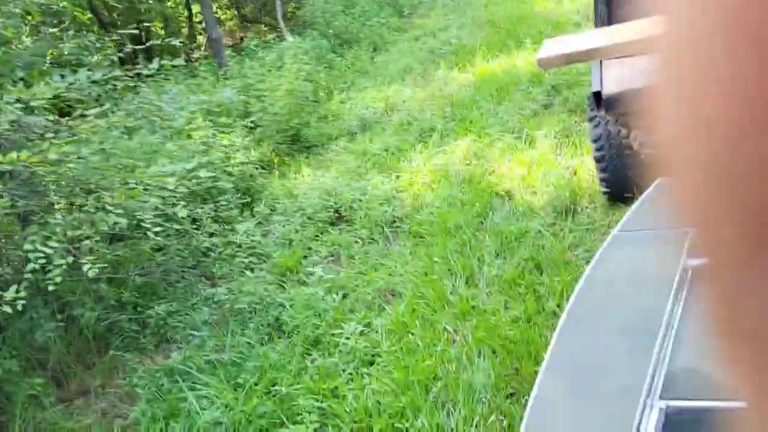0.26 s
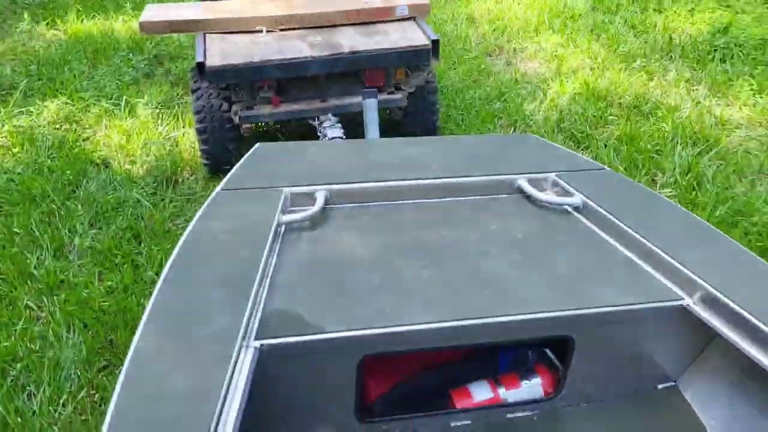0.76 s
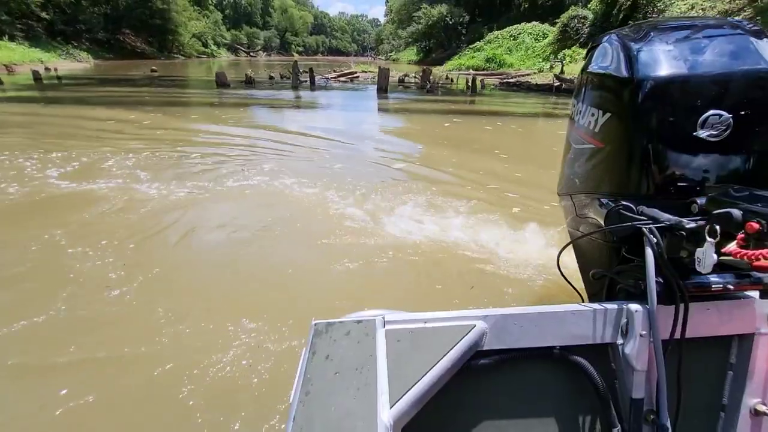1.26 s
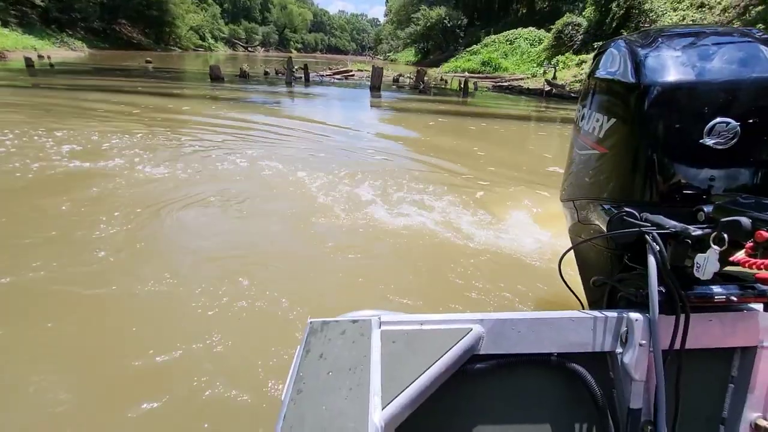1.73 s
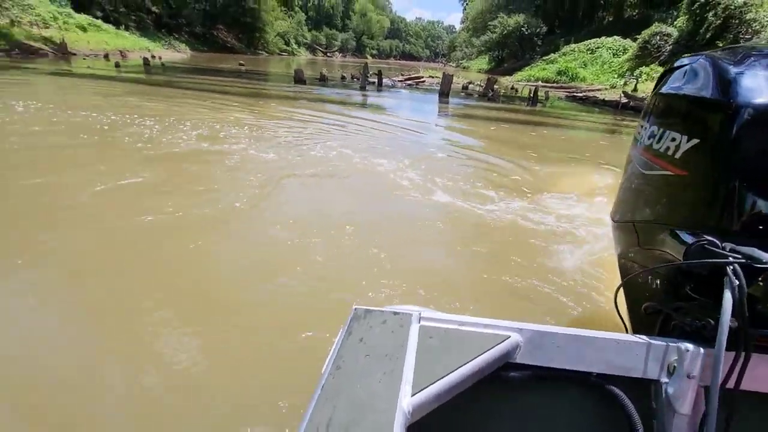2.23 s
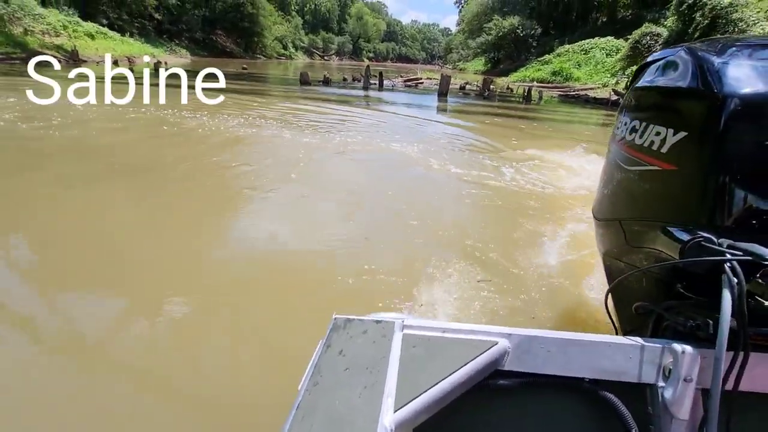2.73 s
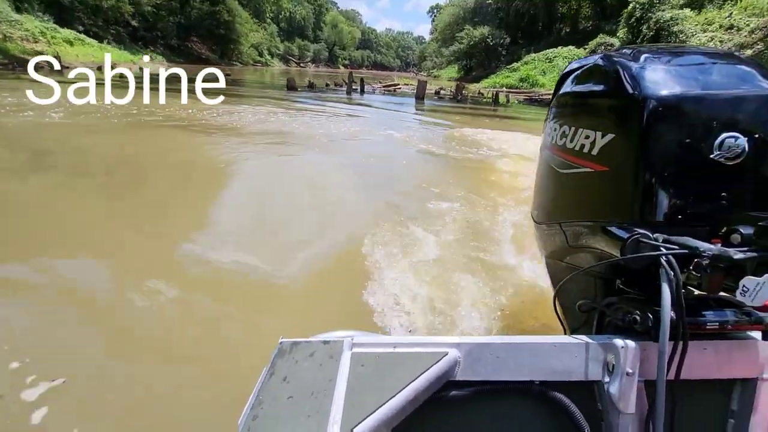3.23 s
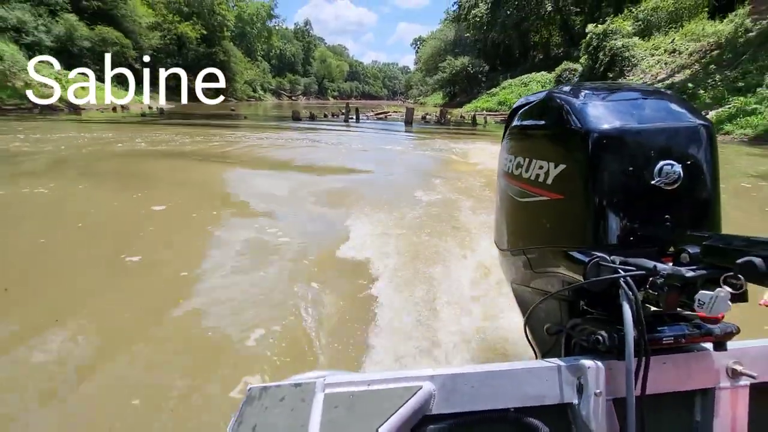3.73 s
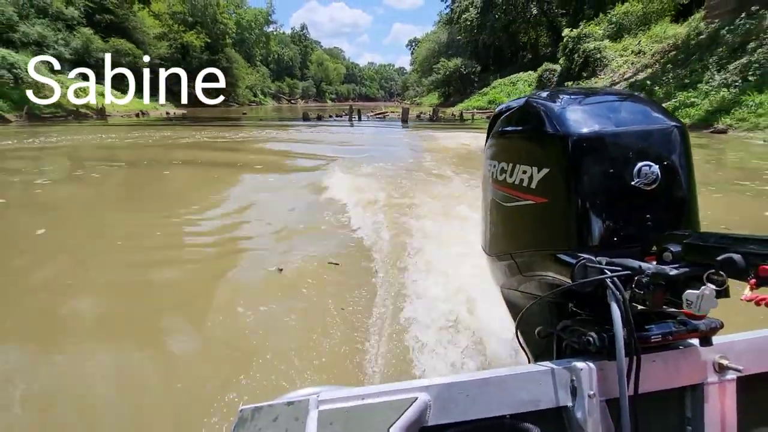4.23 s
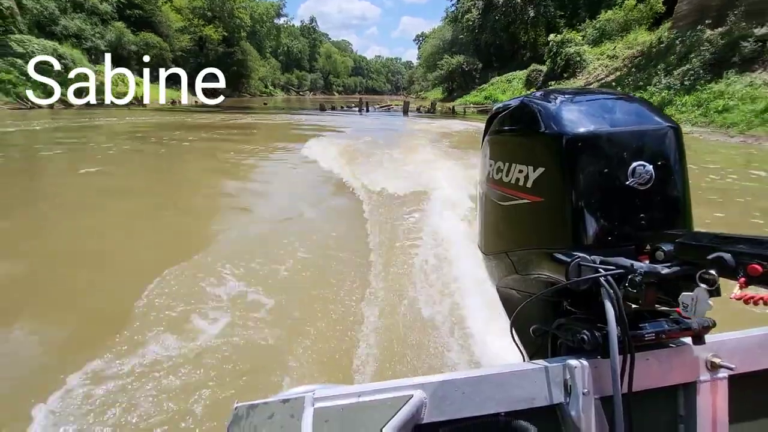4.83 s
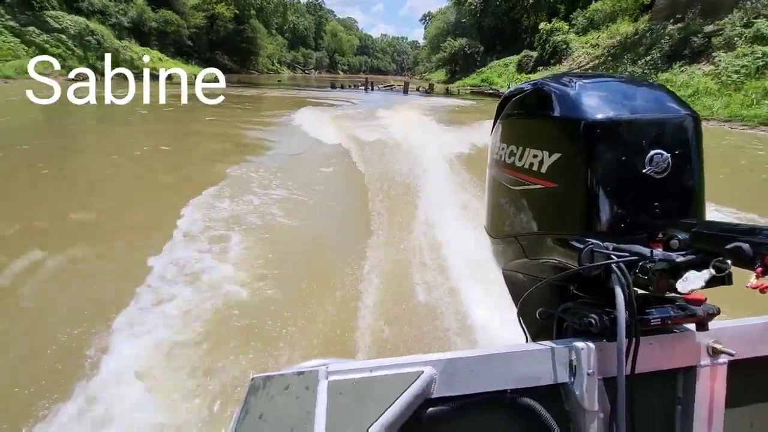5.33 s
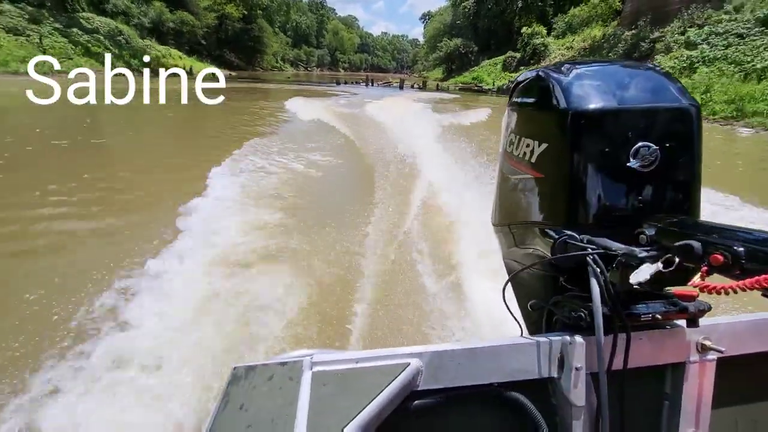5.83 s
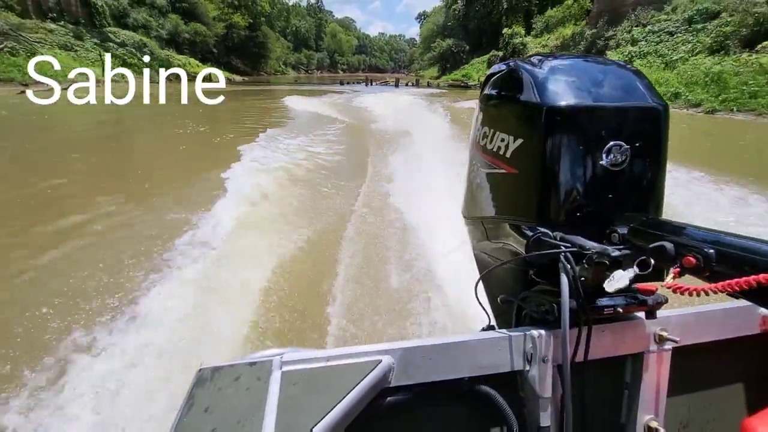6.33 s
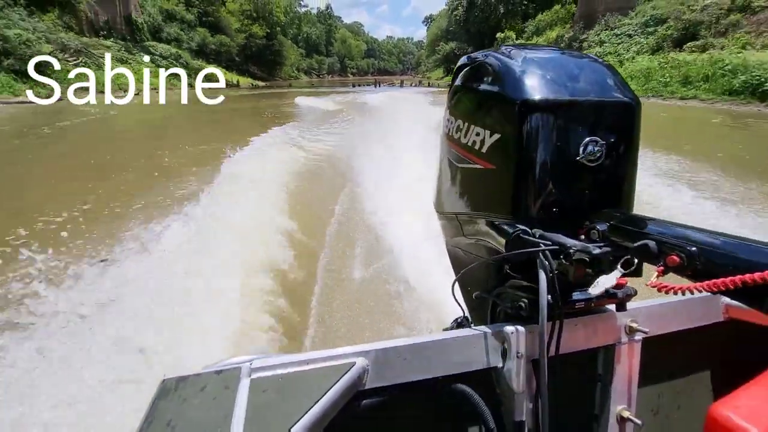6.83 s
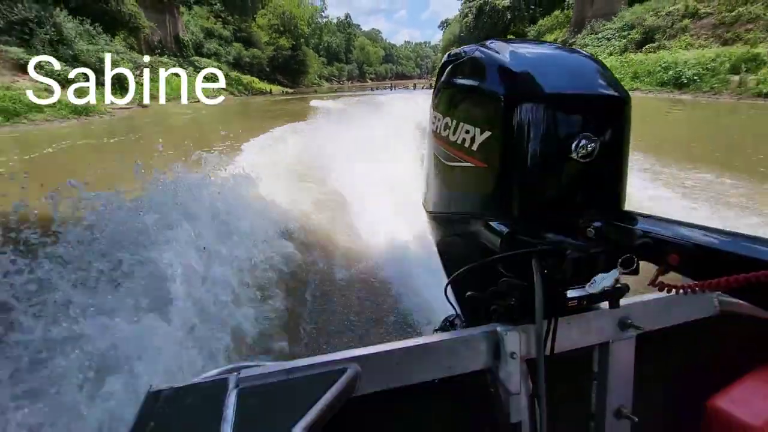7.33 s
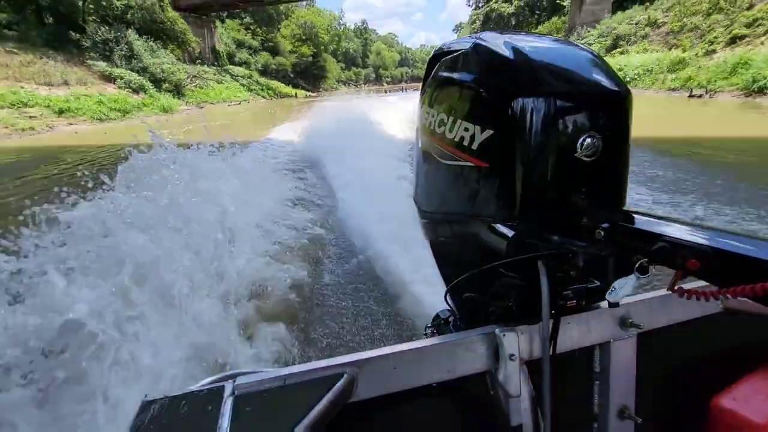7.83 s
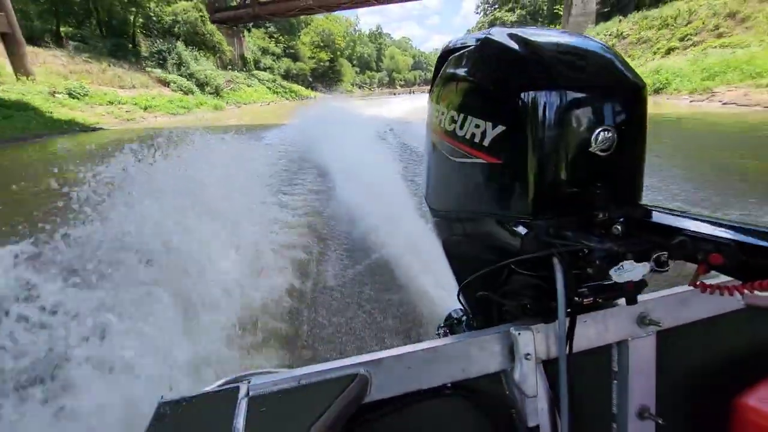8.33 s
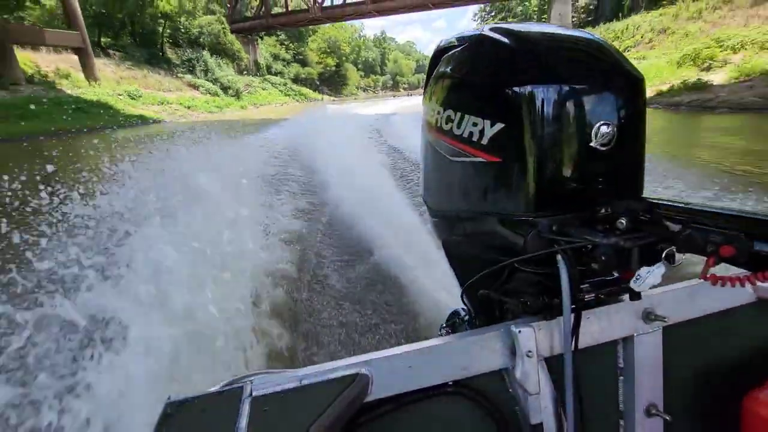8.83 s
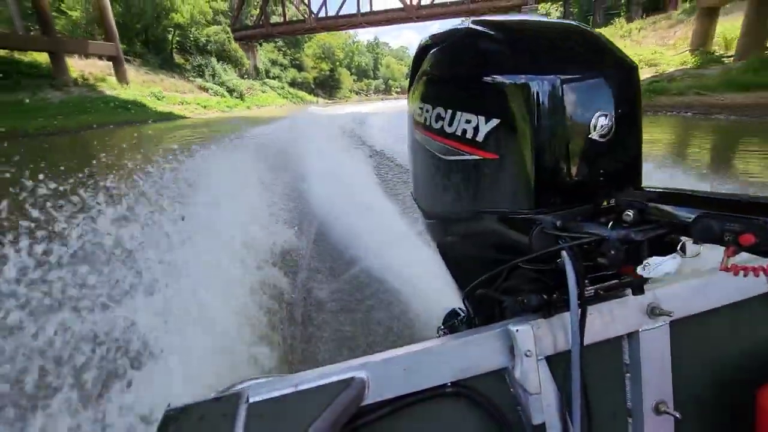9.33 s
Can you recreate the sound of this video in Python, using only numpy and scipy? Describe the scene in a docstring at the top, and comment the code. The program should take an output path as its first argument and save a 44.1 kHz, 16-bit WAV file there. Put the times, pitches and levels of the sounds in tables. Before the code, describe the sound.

Fingers fumble on the microphone on a quiet grassy bank, then a hard cut to an outboard jet motor winding up to a loud steady roar.

```python
"""Fingers on the microphone body first, with rustles, insects and a thin chirp on a quiet grassy bank; then a hard
cut to a four-cylinder four-stroke outboard jet, heard from the boat as it winds up and holds full throttle.
The engine is a stack of sines on the orders of its cycle plus puffed turbulence noise; jet and hull throw
bright grainy spray noise; the headwind is lumpy low noise with crackles. The bank is shaped noise and sines."""
import sys
import numpy as np
from scipy import signal
from scipy.fft import rfft, irfft, next_fast_len
from scipy.io import wavfile
from scipy.ndimage import uniform_filter1d, minimum_filter1d

SR = 44100
rng = np.random.default_rng(int(sys.argv[2]) if len(sys.argv) > 2 else 0)


def digitize_waveform(pressure):
    """Quantize a signal to 16-bit integers and store it at the path in sys.argv[1].

    Rows of a 2-D input are taken as channels; values are limited to [-1, 1].
    """
    field = np.atleast_2d(pressure).T
    bounded = np.clip(field, -1, 1)
    quanta = np.round(bounded * 32767).astype(np.int16)
    wavfile.write(sys.argv[1], SR, quanta)


N = 421596


def amp(db):
    """Decibels to a linear gain."""
    return 10 ** (np.asarray(db) / 20)


def rms_one(x):
    """Scale to an rms of 1."""
    return x / np.sqrt(np.mean(x ** 2) + 1e-20)


def in_time(rows):
    """Draw straight lines between table rows: one curve per column after t."""
    s, *columns = np.transpose(rows)
    t = np.arange(N) / SR
    return [np.interp(t, s, column) for column in columns]


def at_hz(points, hz):
    """Read a spectrum table on a log frequency axis."""
    table_hz, value = np.array(points)[:, :2].T
    return np.interp(np.log(hz), np.log(table_hz), value)


def pan(db):
    """Left and right gains for a level difference."""
    return amp(np.array([db / 2, -db / 2]))


def burst(s, spread_s):
    """A bell-shaped swell centred on s, with its standard deviation in seconds."""
    return np.exp(-.5 * ((np.arange(N) / SR - s) / spread_s) ** 2)


def drift(rate, step=1):
    """Slow chance, read at every step-th sample: sparse noise through a double one-pole low-pass; spread 1."""
    r = np.exp(-80 * np.pi * rate / SR)   # rate in Hz; one noise value per 40 samples
    noise = rng.standard_normal(N // 40 + 2002)
    slow = signal.lfilter([1], [1, -2 * r, r * r], noise)[2000:]   # skip the filter's run-in
    return np.interp(np.arange(0, N, step) / 40, np.arange(len(slow)), rms_one(slow))


def resonance(x, hz, width):
    """Two-pole ringing band around hz, width in Hz."""
    r = np.exp(-np.pi * width / SR)
    poles = [1, -2 * r * np.cos(2 * np.pi * hz / SR), r * r]
    return signal.lfilter([(1 - r * r) / 2, 0, (r * r - 1) / 2], poles, x)


# How alike the two ports hear the motor: f/Hz, likeness (0 to 1)
PORT_LIKENESS = [(60, 0.36), (170, 1), (400, 0.7), (1000, 0.36), (2000, 0.094), (4000, 0.029),
                 (15000, 0.049)]
# Stereo lean of the motor: f/Hz, left minus right level/dB
PORT_LEAN = [(60, 23), (110, -12), (200, -1), (380, 0), (700, -3.5), (1290, -4.5), (2380, -3.5),
             (4400, 0.5), (8120, -4.5), (15000, -6)]
LAG_S = 0.00026   # the motor's noise reaches the right port first


def coloured(spectrum, alike=None, count=1, patchy_db=0, rate=10):
    """Stereo noise of a spectrum; overlapping bands flicker partly alone, partly together; rms 1."""
    size = next_fast_len(N)
    hz = np.maximum(np.arange(size // 2 + 1) * SR / size, 1)
    mid, side = rfft(rng.standard_normal((2, size)))
    signs = np.array([[1], [-1]])   # left, right
    lean = 1
    if alike is None:   # a source at the stern: later on the left, leaning by frequency
        alike = at_hz(PORT_LIKENESS, hz)
        lean = pan(at_hz(PORT_LEAN, hz)) * np.exp(-1j * np.pi * hz * LAG_S * signs)
    c = np.clip(alike, 0, 1)
    both = lean * amp(at_hz(spectrum, hz)) * (np.sqrt(1 + c) * mid + np.sqrt(1 - c) * side * signs)
    if count == 1:
        return rms_one(irfft(both, size)[:, :N])
    band_span = np.log([spectrum[1][0], spectrum[-1][0]])
    place = np.interp(np.log(hz), band_span, [0, count - 1])
    together = drift(3.3)
    out = np.zeros((2, N))
    for k in range(count):
        band = irfft(both * np.maximum(1 - abs(place - k), 0), size)[:, :N]
        out += band * amp(patchy_db * (0.098 * together + drift(rate)))
    return rms_one(out)


# Firing tone, order 4, before its waver: t/s, rms level/dB
FIRING_LEVEL = [(1.25, -39), (1.5, -16.5), (1.64, -12), (1.8, -22.5), (2.0, -20.5), (2.16, -12),
                (2.3, -18.5), (2.55, -23.5), (2.7, -16), (3.2, -9), (3.5, -18), (4.15, -11), (5.0, -9),
                (6.35, -9), (6.5, -12), (7.1, -13), (8.3, -10), (8.9, -13), (9.25, -8), (9.56, -15.5)]
# What the exhaust passes of orders 8 and 12: f/Hz, level above the growl curve/dB
EXHAUST_PIPE = [(90, 14), (140, 8.5), (200, 5.5), (225, -1), (270, -1), (340, -6), (440, -12.5),
                (530, -13.5)]
# Housing resonances that lift passing orders: f/Hz, width at half the lift/Hz, lift/dB
HOUSING_RINGS = [(69, 4.5, 6), (251.1, 12.3, 13.5), (420, 46, 3.5), (690, 60, 9.5), (847, 38, 5),
                 (1015, 27, 6), (1690, 50, 1.5), (1883, 90, 8.5)]
# Weak orders come forward under load: t/s, level/dB
LOAD_STRAIN = [(1.3, -1), (2.7, 2), (3.0, 4), (3.9, 3.5), (4.5, 1), (7.2, 0.5), (7.9, 1.5), (8.6, -1)]
# Overtones swell and fade: t/s, order 6 level/dB, orders 8 and 12 level/dB, order 16 level/dB
OVERTONE_SWELLS = [(1.3, 4, -10, -10), (1.5, 0, 0.5, 1), (2.6, -4, 0.5, -10), (3.4, -12, -0.5, -3),
                   (3.75, -2, 0, -1), (4.05, 1, -2, -14), (4.5, 2.5, -9.5, 1), (5.7, -3, -0.5, 5),
                   (7.0, -8, -1, 2.5), (7.9, 4, 2, 2.5), (8.5, 4.5, 2.5, -3), (8.9, -1, -5.5, -17)]
# Orders that uneven cylinders lift or cancel: order (multiple of the cycle rate), level/dB
UNEVEN_ORDERS = [(2, -4), (5, 2.5), (7, 0.5), (10, 2.5), (13, -18), (14, 4), (18, -18), (19, 5.5),
                 (20, -1.5), (21, 4.5), (22, -9), (24, 1.5), (26, -0.5), (38, 2.5), (44, 0)]
# The hand turns the ports: t/s, lag of the exhaust tone at the left port/s
EXHAUST_LAG = [(1.2, 0.00012), (2.3, 0.00034), (3.6, 0.00018), (5.2, 0.00015), (9.5, 0.000099)]
ROUGH_DB, STEADY_DB = 2.6, .6   # faster waver of the orders while labouring, and at full throttle
SLOW_WAVER_DB = 2.5   # weak orders come and go
WEAK_DB, WEAK_DB_PER_OCTAVE = -11.5, -5   # order 2 against the growl curve, and the fall above it
EVEN_DB, FOURTH_DB = 1.5, 3.5   # whole crank turns stand out, multiples of the firing rate more so
LABOUR_DB = 7   # extra for multiples of the firing rate, fading out as the boat planes


def engine(cycles, phase, growl_db, planing, step=40):
    """Exhaust tone: sines on the orders of the cycle; their slow levels are worked out on a coarse grid."""
    speed, growl_db, labouring = cycles[::step], growl_db[::step], 1 - planing[::step]
    strain_db = in_time(LOAD_STRAIN)[0][::step]
    waver_db = ROUGH_DB + (STEADY_DB - ROUGH_DB) * planing[::step] ** 2
    sixth_db, low_db, high_db = np.array(in_time(OVERTONE_SWELLS))[:, ::step]

    levels = {4: in_time(FIRING_LEVEL)[0][::step] + STEADY_DB * drift(14, step)}
    for k in [8, 12]:
        levels[k] = growl_db + low_db + at_hz(EXHAUST_PIPE, k * speed) + waver_db * drift(18, step)
    # weak orders follow the growl curve, ring in the housing and waver on their own
    for k in sorted(set(range(2, 47)) - set(levels)):
        even, fourth = k % 2 == 0, k % 4 == 0
        order_db = WEAK_DB + WEAK_DB_PER_OCTAVE * np.log2(k / 2) + EVEN_DB * even
        order_db = order_db + (FOURTH_DB + LABOUR_DB * labouring) * fourth
        lift_db = sum(db / (1 + (2 * (k * speed - hz) / width) ** 2) for hz, width, db in HOUSING_RINGS)
        wander_db = SLOW_WAVER_DB * drift(1.64, step) + waver_db * drift(9.2, step)
        levels[k] = growl_db + strain_db + order_db + lift_db + wander_db
    levels[6] += sixth_db
    levels[16] += high_db
    for k, db in UNEVEN_ORDERS:
        levels[round(k)] += db

    out, fine, coarse = np.zeros((2, N)), np.arange(N), np.arange(0, N, step)
    half_lag = np.pi * cycles * in_time(EXHAUST_LAG)[0]   # as phase of the cycle
    ports = np.array([phase - half_lag, phase + half_lag])
    for k, level_db in levels.items():
        lean = pan(at_hz(PORT_LEAN, np.maximum(k * speed, 200)))
        gains = np.sqrt(2) * amp(level_db) * lean   # rms to peak
        for side in range(2):
            sine = np.sin(k * ports[side] + k * k * 2.4)   # start phases spread over the orders
            out[side] += np.interp(fine, coarse, gains[side]) * sine
    return out


# Full-throttle growl colour: f/Hz, relative level per Hz/dB
FULL_GROWL_COLOUR = [(59, -42), (100, -28), (119, -17), (145, -10.5), (177, -7), (198, -11.5), (228, -9),
                     (350, -12), (560, -16.5), (693, -15), (765, -14), (1900, -23.5), (3000, -35),
                     (3900, -52), (6600, -120)]
# Idle growl colour: f/Hz, relative level per Hz/dB
IDLE_GROWL_COLOUR = [(120, -33), (200, 10.5), (345, -4), (437, 2.5), (536, -12), (872, -8.5), (1000, -7.5),
                     (1270, -6), (3000, -29), (3900, -68), (6600, -120)]
# Cowl resonances, plain at low speed: f/Hz, width of each of two passes/Hz, level against the idle noise/dB
COWL_RINGS = [(436.4, 32, -3.5), (872, 33, -9.5), (1564, 33, -16), (2080, 140, -16)]
# Narrow hiss, before its waver: t/s, level/dB
WHISTLE_LEVEL = [(1.1, -74), (1.7, -60), (2.2, -47), (3.2, -42.5), (3.5, -51), (4.5, -70)]
WHISTLE_HZ, WHISTLE_WIDTH_HZ = 5510, 130


def growl(phase, growl_db, planing):
    """Intake and exhaust turbulence, puffed at each firing, the cylinders unequal; a narrow whistle on top."""
    puffs = 1 + 0.26 * np.cos(4 * phase) + 0.099 * np.cos(phase) + 0.043 * np.cos(2 * phase + 1.7)
    full = coloured(FULL_GROWL_COLOUR, count=7, patchy_db=2.87, rate=8.7)
    idle = coloured(IDLE_GROWL_COLOUR)
    white = coloured([(20, 0), (20000, 0)])
    for hz, width, db in COWL_RINGS:
        ring = resonance(resonance(white, hz, width), hz, width)
        idle += amp(db + 0.83 * drift(6.0)) * rms_one(ring)
    hiss = rms_one(resonance(white, WHISTLE_HZ, WHISTLE_WIDTH_HZ))
    whistle = amp(in_time(WHISTLE_LEVEL)[0] + 1.0 * drift(9)) * hiss
    blend = amp(-4.5) * np.sqrt(planing) * full + amp(-1.0) * np.sqrt(1 - planing) * idle
    return amp(growl_db) * puffs * blend + whistle


# Jet and wake at full throttle: f/Hz, relative level per Hz/dB
WAKE_COLOUR = [(880, -4), (1500, -7.5), (1610, 3), (1900, 1.5), (2200, -8), (2550, -11), (3170, -9.5),
               (4290, -10), (4970, -7.5), (6420, -13), (8450, -6), (10400, -15.5), (12900, -16),
               (14900, -16), (15700, -24)]
# Churning water before the boat moves: f/Hz, relative level per Hz/dB
CHURN_COLOUR = [(880, -2), (1500, 3.5), (2140, 7), (2310, 5.5), (3930, -1), (5600, -0.5), (7440, -3.5),
                (8540, 1.5), (10500, -4.5), (12900, -2), (15700, -6)]


def spray(spray_db, planing):
    """Jet and wake: bright noise, with drops that crackle through it."""
    drop_size = amp(2.8 * np.minimum(rng.exponential(1, (2, N)), 5))
    drops = drop_size * (rng.random((2, N)) < 2500 / SR)   # about 2500 drops a second per port
    grain = rms_one(1 + 4.0 * uniform_filter1d(drops, size=40))
    wake = coloured(WAKE_COLOUR, count=7, patchy_db=1.0, rate=13.0)
    churn = coloured(CHURN_COLOUR)
    blend = amp(0.5) * np.sqrt(planing) * wake + amp(2.0) * np.sqrt(1 - planing) * churn
    return amp(spray_db) * grain * blend


# Headwind, rising to hard gusts near the end, before the wind gain: t/s, left level/dB, right level/dB
HEADWIND = [(1.13, -32.5, -35), (1.9, -30.5, -36), (2.5, -29, -33), (3.05, -35, -36), (3.2, -30, -31),
            (3.6, -37, -41), (5.0, -33, -31.5), (6.3, -34.5, -36), (6.9, -28.5, -43), (8.0, -31.5, -36),
            (8.4, -18, -37), (8.85, -19.5, -33), (9.2, -11.5, -24), (9.55, -21, -42)]
# Wind colour: f/Hz, relative level per Hz/dB
WIND_COLOUR = [(12, -39.5), (20, -22), (53, 6.5), (85, 8.5), (166, -1.5), (238, -6), (464, -11),
               (1120, -20), (1500, -47), (1950, -68.5), (3300, -120)]
# Single puffs on the left port, before the wind gain: t/s, level/dB
PUFFS = [(3.82, -17), (4.38, -26), (4.53, -22), (4.77, -24), (5.27, -33), (5.45, -26), (6.32, -24),
         (6.48, -27), (6.65, -26), (6.84, -27), (6.97, -20.5), (7.15, -18.5), (7.56, -30), (7.72, -38),
         (7.91, -16.5), (8.26, -35), (8.42, -18.5)]
# Wind crackles on the left port, before the crackle trim: t/s, level/dB
GUST_CRACKLES = [(7.167, -11), (7.469, -14), (7.908, -27), (8.237, -8), (8.347, -33), (8.352, -8),
                 (8.369, -7), (8.517, -9), (8.528, -8), (8.737, -15), (9.014, -5.5), (9.058, -12),
                 (9.123, -7.5), (9.157, -24), (9.212, -31), (9.247, -21), (9.287, -7)]
PUFF_SPREAD_S, CRACKLE_SPREAD_S = 0.021, .003
WIND_ALIKE = .55   # likeness of the wind noise at the two ports


def wind():
    """Lumpy low noise, partly each port's own; hard gusts crackle on the exposed left port."""
    level = amp(in_time(HEADWIND))
    level[0] += sum(amp(db) * burst(s, PUFF_SPREAD_S) for s, db in PUFFS)
    lumps = amp(np.array([2.0 * drift(36), 3.3 * drift(5.3)]))   # left, right
    out = amp(6.0) * level * rms_one(coloured(WIND_COLOUR, alike=WIND_ALIKE) * lumps)
    crackle_colour = [(100, 13), (300, 6.0), (1200, -9.0), (3500, -27.0), (8000, -37)]
    crackle = coloured(crackle_colour, alike=0)[0]
    gusts = sum(amp(db + 1.5) * burst(s + .002, CRACKLE_SPREAD_S) for s, db in GUST_CRACKLES)
    pops = level[0] * amp(-7.0 + 4.3 * np.minimum(drift(41), 2))   # small pops ride on every gust
    out[0] += crackle * (gusts + pops)
    return out


# Hand moving at the left port: t/s, rumble level/dB
HAND_RUMBLE = [(.01, -41.5), (.1, -37.5), (.17, -32), (.24, -44), (.47, -60), (.65, -54), (.8, -49),
               (.88, -44.5), (1.05, -48.5)]
# Fingers rubbing the right port: t/s, level/dB
FINGER_RUBS = [(.17, -47), (.39, -36.5), (.46, -36), (.57, -42), (.69, -38), (.89, -41)]
# Lower rustle colour: f/Hz, relative level per Hz/dB
LOW_RUSTLE_COLOUR = [(88, -20.5), (150, -10.5), (451, -11), (568, -20), (734, -20.5), (1110, -31),
                     (1500, -27), (2240, -22), (3200, -36), (4160, -64), (7040, -120)]
# Upper rustle colour: f/Hz, relative level per Hz/dB
HIGH_RUSTLE_COLOUR = [(1470, -39), (2500, -11), (4480, -4), (6790, -11), (8750, -4), (9600, -13),
                      (13800, -12), (15700, -20)]
RUB_SPREAD_S, RIGHT_REST_DB = 0.035, -53
LOW_RUSTLE_DB, HIGH_RUSTLE_DB = -54, -60.5   # at mean handling
LOW_FOLLOWS, HIGH_FOLLOWS = 0.75, .4   # share of the rumble's swing in dB


def handling():
    """Hand and finger friction: low rumble, with two rustling noise beds that follow the hand."""
    hand_db, = in_time(HAND_RUMBLE)
    swing_db = hand_db - np.mean(np.transpose(HAND_RUMBLE)[1])
    fingers = amp(RIGHT_REST_DB) + sum(amp(db) * burst(s, RUB_SPREAD_S) for s, db in FINGER_RUBS)
    rumble = coloured([(15, -30), (40, 9.5), (110, 0), (250, -29), (600, -44)], alike=.5)
    out = np.array([amp(hand_db), fingers]) * rumble
    out += amp(LOW_RUSTLE_DB + LOW_FOLLOWS * swing_db) * coloured(LOW_RUSTLE_COLOUR, alike=0.37)
    out += amp(HIGH_RUSTLE_DB + HIGH_FOLLOWS * swing_db) * coloured(HIGH_RUSTLE_COLOUR, alike=0.084)
    return out


# Thumps of the hand, before a 3 dB cut: t/s, peak level/dB, f/Hz, left minus right level/dB, 60 dB decay/s
HAND_THUMPS = [(0.029, -25, 59.2, 27, 0.031), (0.159, -8.5, 84.5, -22, 0.025),
               (0.655, -36, 70.0, -22.0, 0.11), (0.819, -23, 91.5, 0, 0.13)]


def thumps():
    """Each knock is a low sine that starts at once and dies away exponentially."""
    t = np.arange(N) / SR
    out = np.zeros((2, N))
    for s, db, hz, side_db, t60 in HAND_THUMPS:
        age = np.maximum(t - s, 0)
        out += pan(side_db)[:, None] * amp(db - 3.0 - 60 * age / t60) * np.sin(2 * np.pi * hz * age)
    return out


# Hand and cloth, before a 3.5 dB cut: t/s, level/dB, centre f/Hz, width/octaves, spread/s
CLOTH_RUSTLES = [(0.16, -45, 8000, 1.2, 0.0058), (0.179, -42, 5000, 2.9, 0.015), (.24, -50, 6000, 2, 0.013),
                 (.39, -54, 9000, 1.2, 0.02), (.43, -59, 9000, 1.2, .015), (.52, -57, 1400, 1.2, 0.011),
                 (0.616, -53, 1700, .7, 0.013), (.715, -40, 420, 0.74, 0.0084),
                 (0.718, -53, 1800, 1.4, 0.016), (0.825, -54, 8000, 1.5, 0.0099),
                 (.88, -60, 2100, 0.35, .12), (.27, -60, 4200, 0.27, 0.055),
                 (1.02, -39.5, 7340, 0.37, 0.0037), (1.035, -40, 420, 0.82, 0.016),
                 (1.032, -51, 2000, 1.2, 0.016)]


def rustles():
    """Rubbing hand and cloth: short bell-shaped swells of band-passed noise."""
    white = rng.standard_normal((2, SR * 2))
    out = np.zeros((2, N))
    for s, db, hz, octaves, spread_s in CLOTH_RUSTLES:
        edges = np.minimum(hz * 2 ** (np.array([-.5, .5]) * octaves), .45 * SR)
        band = signal.sosfilt(signal.butter(2, edges, "band", fs=SR, output="sos"), white)
        out[:, :SR * 2] += amp(db - 3.5) * burst(s, spread_s)[:SR * 2] * rms_one(band)
    return out


# Thin chirp: t/s, f/Hz, peak level/dB
CHIRP_GLIDE = [(.70, 8000, -95), (.72, 7970, -70), (.74, 8300, -68), (.78, 8700, -63), (.84, 8750, -60),
               (.87, 9400, -70), (.91, 9500, -64), (.93, 9500, -85)]


def chirp():
    """One sine gliding in pitch and level, equal in both ports."""
    hz, db = in_time(CHIRP_GLIDE)
    return amp(db) * np.sin(2 * np.pi * np.cumsum(hz) / SR)


INSECT_DB, INSECT_HZ, INSECT_WIDTH_HZ = -66.5, 8750, 500   # width of each resonance pass


def insects():
    """Insect drone: two seconds of noise through the same resonance twice."""
    white = rng.standard_normal((2, SR * 2))
    drone = resonance(resonance(white, INSECT_HZ, INSECT_WIDTH_HZ), INSECT_HZ, INSECT_WIDTH_HZ)
    out = np.zeros((2, N))
    out[:, :SR * 2] = amp(INSECT_DB) * rms_one(drone)
    return out


# Engine speed: t/s, cycle rate f/Hz (a cycle is two crank turns)
ENGINE_SPEED = [(1.12, 10.5), (1.42, 11.7), (1.52, 13.74), (1.62, 16.99), (1.72, 19.13), (1.82, 20.89),
                (2.02, 22.55), (2.32, 26.74), (2.42, 27.2), (2.82, 28.26), (2.92, 30.08), (3.02, 32.78),
                (3.42, 41.08), (3.54, 42.1), (3.87, 43.87), (4.4, 43.61), (5.6, 43.63), (6.3, 43.9),
                (7.2, 42.98), (8.0, 42.62), (8.24, 41.6), (8.6, 41.59), (9.0, 39.8), (9.4, 40.7),
                (9.56, 40.74)]
# Noise of the boat, before each layer's blend gains: t/s, growl level/dB, spray level/dB
BOAT_NOISE = [(1.17, -29, -36), (1.5, -31, -38.5), (2.07, -27, -33), (2.84, -23.5, -31.5),
              (3.03, -19.5, -29.5), (3.34, -19, -30.5), (3.43, -15.5, -28), (3.7, -17, -27.5),
              (4.14, -18, -29.5), (4.39, -20, -31), (5.25, -21.5, -34.5), (6.13, -22.5, -34.5),
              (7.48, -21.5, -32), (7.97, -20.5, -31), (8.4, -22, -33), (8.55, -21, -35), (9.1, -27, -35.5),
              (9.26, -20.5, -33), (9.51, -26.5, -38)]
PLANING_FROM_HZ, PLANING_AT_HZ = 9.5, 45   # cycle rates between which idle turns into full-throttle colour
BANK_ENDS_S, BOAT_STARTS_S = 1.090, 1.1115


def scene():
    """The boat's layers share one engine speed; the bank is heard before the cut to them."""
    cycles, = in_time(ENGINE_SPEED)
    phase = 2 * np.pi * np.cumsum(cycles * (1 + 0.0017 * drift(8.0))) / SR
    planing = np.clip((cycles - PLANING_FROM_HZ) / (PLANING_AT_HZ - PLANING_FROM_HZ), .02, .98)
    growl_db, spray_db = in_time(BOAT_NOISE)
    boat = engine(cycles, phase, growl_db, planing) + growl(phase, growl_db, planing)
    boat += spray(spray_db, planing) + wind()
    bank = handling() + thumps() + rustles() + chirp() + insects()
    t = np.arange(N) / SR
    bank_gate = np.clip((BANK_ENDS_S - t) / 0.0048, 0, 1)
    boat_gate = np.clip((t - BOAT_STARTS_S) / 0.0011, 0, 1)
    return bank * bank_gate + boat * boat_gate


LIMIT_DB, RELEASE_DB_PER_S = -0.5, 30
CUTOFF_HZ = 15600


def record(dry):
    """The capsule loses the deepest bass; a limiter looks ahead and ducks both channels on peaks; the top is cut."""
    wet = signal.sosfilt(signal.butter(2, 28, "high", fs=SR, output="sos"), dry)
    over_db = np.maximum(20 * np.log10(abs(wet).max(axis=0) + 1e-9) - LIMIT_DB, 0)
    ramp = RELEASE_DB_PER_S * np.arange(N) / SR
    held = np.maximum.accumulate(over_db + ramp) - ramp   # instant hold, steady release
    duck_db = uniform_filter1d(-minimum_filter1d(-held, size=129), size=129)   # widened, then smoothed
    top_cut = signal.ellip(12, .3, 75, CUTOFF_HZ, fs=SR, output="sos")
    return signal.sosfilt(top_cut, wet * amp(-duck_db)).clip(-1, 1)


dry = scene()
out = record(dry)
digitize_waveform(out)
```